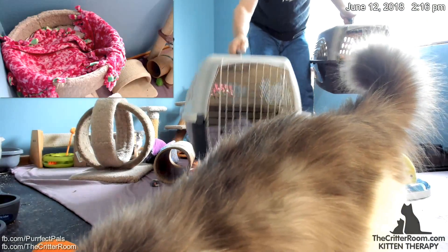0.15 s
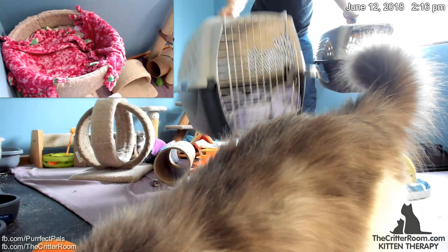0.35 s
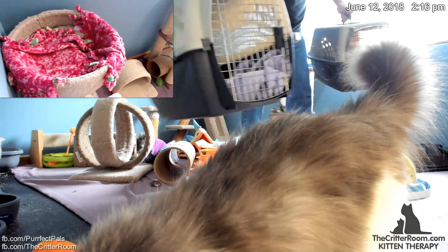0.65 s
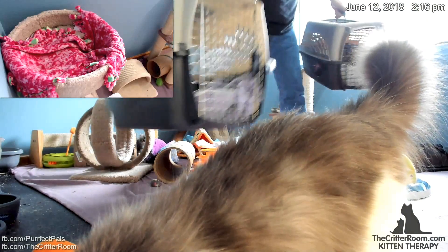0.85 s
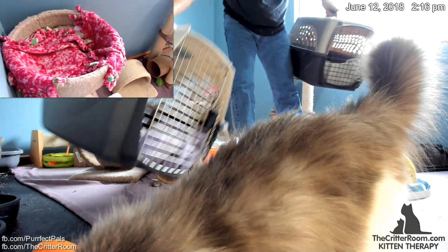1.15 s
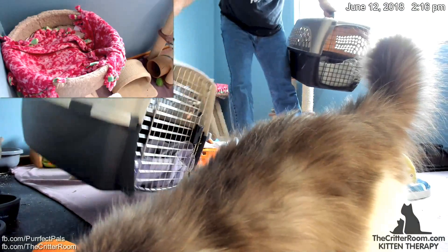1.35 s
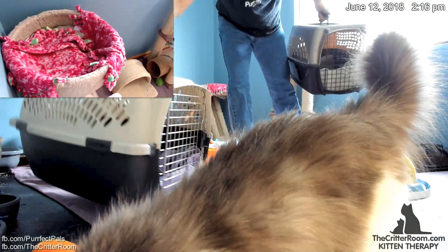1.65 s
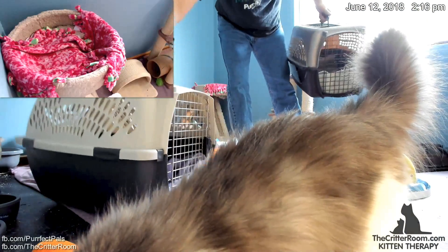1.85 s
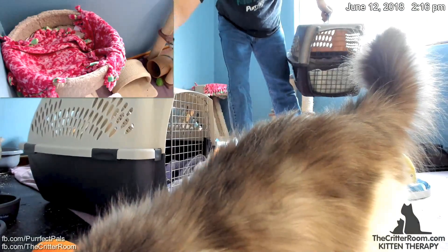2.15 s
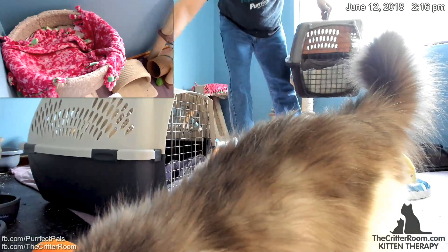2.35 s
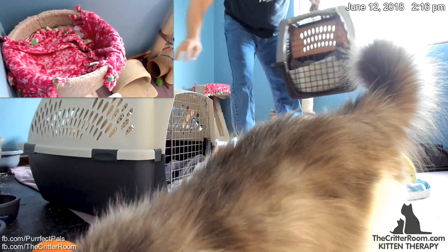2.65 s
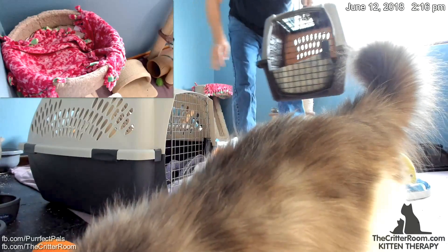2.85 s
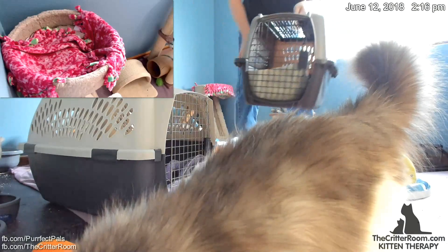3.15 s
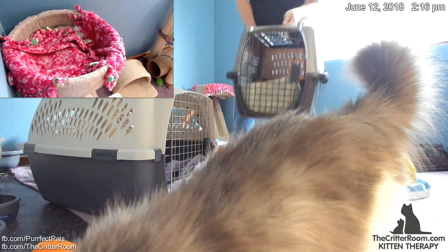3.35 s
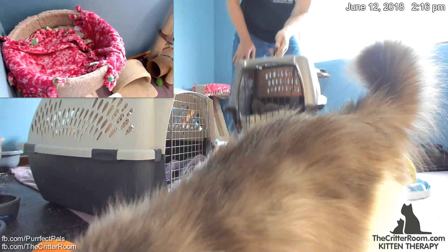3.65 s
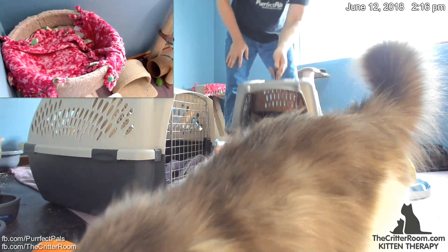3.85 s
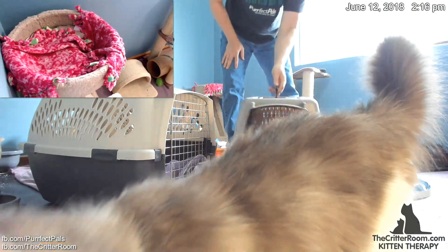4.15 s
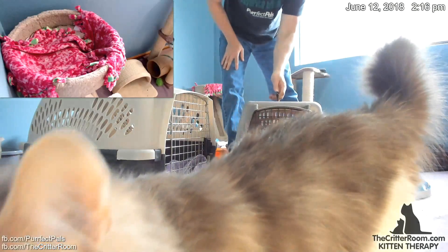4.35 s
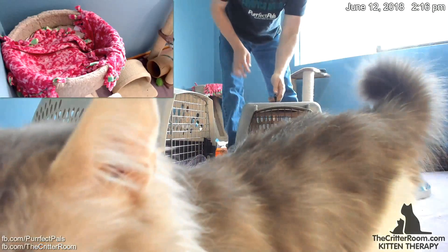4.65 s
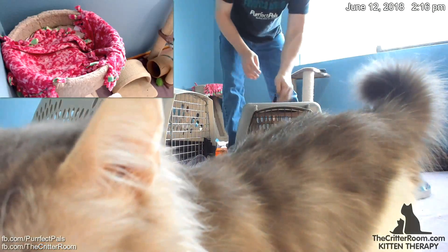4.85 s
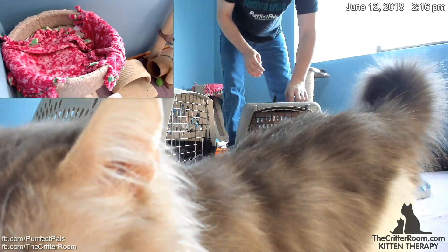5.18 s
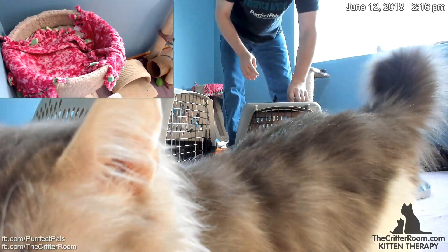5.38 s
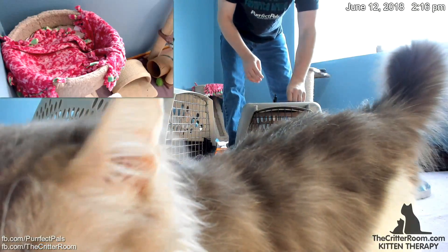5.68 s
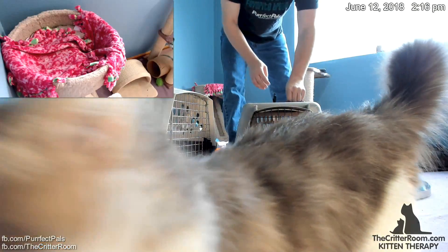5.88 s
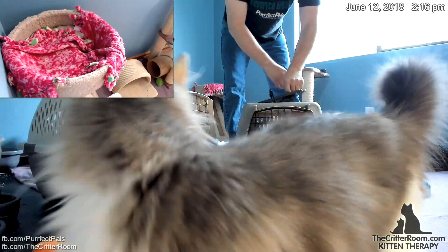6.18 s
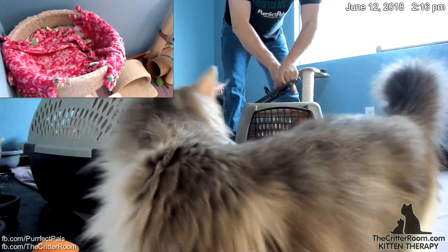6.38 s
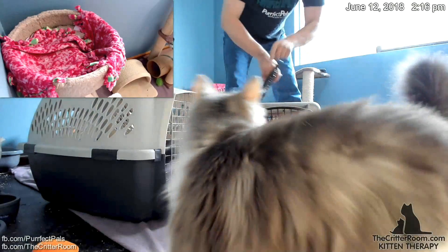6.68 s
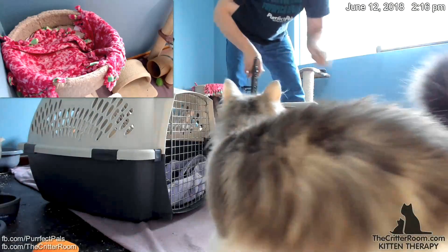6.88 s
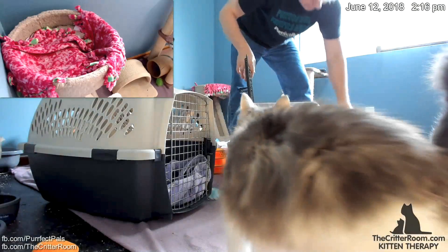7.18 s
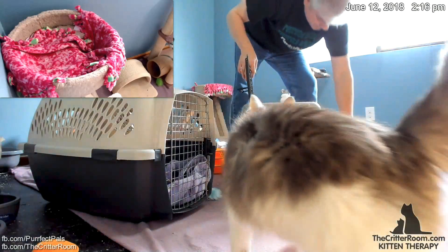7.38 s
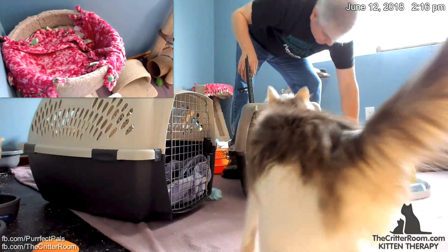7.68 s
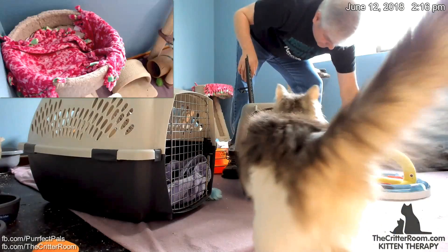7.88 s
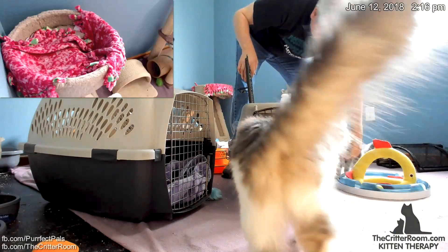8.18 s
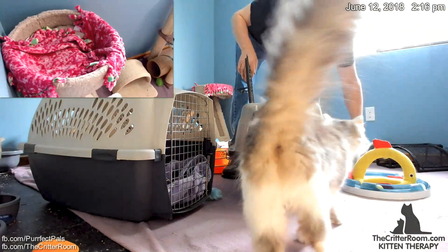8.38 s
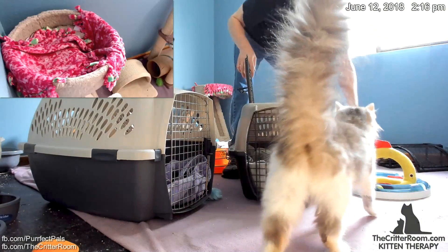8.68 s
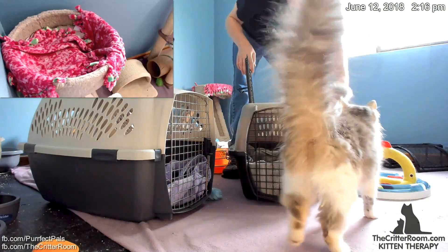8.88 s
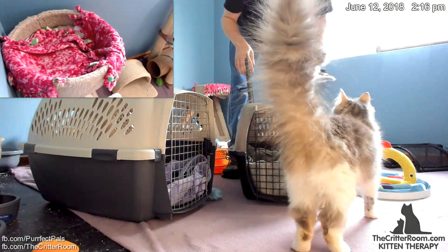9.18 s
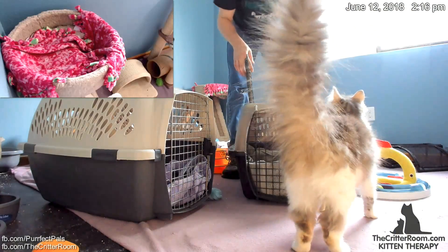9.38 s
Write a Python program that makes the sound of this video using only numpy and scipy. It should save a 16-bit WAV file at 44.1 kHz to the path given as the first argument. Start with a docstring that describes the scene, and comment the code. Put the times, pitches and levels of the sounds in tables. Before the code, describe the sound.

A quiet small room with soft air hiss and a faint low fan hum. From 0 to 1 s a load slides softly back and forth inside a plastic carrier; from 1.1 to 2.2 s come dull thumps, cloth swishes and tiny plastic squeaks. At about 2.37 s the big carrier hits the floor corner by corner with a loud hollow bang, the loudest event; the background ducks, then creeps back up. Around 3.3-3.45 s a smaller carrier lands with a lighter, ringing knock. From 4.2 to 5.3 s its handle taps and creaks. From 5.45 to 6.5 s the wire door clacks, scrapes and squeals metallically, ending in two sharp clacks. A close cat gives tiny hoarse chirps at 6.8 s and 7.86 s, a meow at 8.2-8.9 s turning from hoarse to clear and roughening at the end, and a raspy one from 9.2 s.

```python
"""Two plastic pet carriers are set down in a small room: a big one lands with a hollow bang, a smaller one with a knock.
Its handle drops and its wire top door is unlatched, scraped and swung open. Each blow mixes noise and fading tones;
rubbing is a stream of tiny clicks or noise. A cat close by chirps, gives a meow that starts hoarse and turns clear,
then starts a raspy second one, all built from harmonics. Quiet room air and a faint fan hum lie beneath.
The bang pushes the recorder's gain down, and it creeps back up."""
import sys
import numpy as np
from scipy import signal
from scipy.fft import rfft, irfft
from scipy.io import wavfile
from scipy.ndimage import uniform_filter1d

SR = 44100
rng = np.random.default_rng(int(sys.argv[2]) if len(sys.argv) > 2 else 0)


def store_pcm(level_fs):
    """Save levels as 16-bit WAV."""
    pcm = np.round(np.clip(level_fs, -1, 1) * 32767).astype(np.int16)
    wavfile.write(sys.argv[1], SR, np.atleast_2d(pcm).T)


N = 420273
TIME = np.arange(N) / SR

# All levels are those before the room and the recorder's gain. each carrier lands with a blow, then bounces and
# lands again [t/s, level/dB, bass/dB, treble/dB, build-up/s]
BIG_LANDING = [(2.3652, -13, 3, 4, .0006), (2.3755, -18, -10, -0.5, 0.0012), (2.3925, -23.5, -3, 3, 0.0012),
               (2.421, -36.5, -10.5, 0.5, 0.0021)]
SMALL_LANDING = [(3.3995, -22.5, 4.5, -10, 0.0014), (3.4115, -25.5, -13.5, 0.5, 0.0011),
                 (3.4245, -30, -2, -2, 0.0011)]
# light knocks on the big carrier [t/s, level/dB, bass/dB, treble/dB, build-up/s]
BIG_KNOCKS = [(0.002, -47.5, -4.5, 13, 0.0036), (0.52, -56.5, -13, -29, .0008),
              (0.987, -66, -29, 13, 0.00022), (1.124, -55.5, -13, 12, 0.0054),
              (1.642, -63.5, -2, -22, .002), (1.872, -53, 8.5, 9, .003), (2.213, -63, 2.5, -13.5, .006),
              (2.347, -35, -3, -5, .005), (2.728, -66, 3, -3, .003), (2.865, -64, -22, -18, .003)]
# light knocks on the small carrier, and its handle and lid knocking on the shell
# [t/s, level/dB, bass/dB, treble/dB]
SMALL_KNOCKS = [(3.280, -49, 4, -3), (3.336, -41.5, -16, 20), (3.353, -30.5, -1, -29),
                (3.492, -40.5, 1.5, -5)]
HANDLE_KNOCKS = [(4.236, -44.5, -20, 2.5), (4.244, -41.5, 13, -15), (4.283, -42.5, 1, -20),
                 (4.443, -50.5, 0, -18), (4.488, -49.5, 10, 1), (4.624, -44.5, -23, -1), (4.673, -38, 4, 7),
                 (4.941, -58.5, -12, 13), (5.085, -45.5, 18, 7.5), (5.339, -53.5, -45, 7.5),
                 (6.357, -42.5, 8.5, -10)]
# clacks of the latch and wire door [t/s, level/dB, treble/dB, build-up/s, shaken shell level/dB,
# struck wire level/dB, its lower ring f/Hz, its upper ring f/Hz]
CLACKS = [(5.461, -36, 13, 0.0087, -41, -38.5, 3800, 4900),
          (5.596, -46.5, 20, .002, -49, -46.5, 3540, 4690), (5.636, -57, -4, 0.0018, -49, -50, 3870, 4340),
          (5.695, -51, -9, .004, -46.5, -51, 2020, 4000), (5.752, -48, -7, 0.0069, -51.5, -47, 1940, 4350),
          (5.849, -56.5, -2, 0.0016, -82, -55, 3000, 4035), (5.987, -55, 3, 0.0036, -71, -52, 3900, 4940),
          (6.034, -40, 2.5, 0.0087, -58, -38, 4220, 4960), (6.096, -30, 3, 0.0054, -48.5, -49, 3830, 4270),
          (6.245, -45, 3, 0.0036, -69.5, -56, 4470, 6630), (6.276, -35, 11, 0.0022, -47, -40.5, 5980, 6800),
          (6.481, -27, 11.5, 0.0014, -49.5, -40, 3140, 4670),
          (6.5173, -29.5, 0, 0.000193, -30, -31, 5920, 7200)]
# soft thumps of footsteps and of the swinging load [t/s, level/dB, f/Hz]
THUMPS = [(1.135, -64, 254), (1.239, -61, 252), (1.368, -58, 220), (1.461, -55.5, 235), (1.556, -59, 253),
          (1.737, -45.5, 247), (1.786, -51, 263.6), (1.832, -52.5, 236), (1.884, -43.5, 253),
          (1.912, -45, 249.4), (1.958, -54, 227), (2.127, -60, 191), (2.237, -57.5, 241)]
# swishes of clothing; the wire door scraping in its frame; the load in the big carrier sliding
# back, then forth; the handle creaking [peak t/s, level/dB, rise/s, fall/s]
SWISHES = [(1.45, -66, 0.13, 0.13), (2.08, -66.5, 0.18, 0.055), (3.08, -60, 0.11, 0.3),
           (3.53, -57.5, 0.22, 0.11), (4.5, -56.5, 0.27, 0.11), (7.35, -69, 0.36, 0.52)]
SCRAPES = [(5.53, -46, 0.079, 0.078), (5.64, -41, 0.05, 0.09), (6.19, -57.5, 0.026, 0.086)]
SLIDES = [(.25, -58.5, 0.32, 0.19), (.64, -59, 0.14, 0.18)]
CREAKS = [(4.65, -47.5, 0.01, 0.066), (4.986, -50, 0.029, 0.052)]
# a resonance that rises as the load slides forth [t/s, level/dB, f/Hz]
SLIDE_RING = [(.56, -78, 2830), (.64, -75, 2980), (.78, -73, 3200), (.9, -84, 3500)]
# the plastic squeaks; single wires sing as the bolt and door rub along them
# [peak t/s, level/dB, f/Hz, rise/s, fall/s]
PLASTIC_SQUEAKS = [(1.484, -58, 2380, 0.0042, 0.017), (1.643, -52, 606, 0.0068, 0.021),
                   (1.885, -66, 670, 0.022, 0.04), (1.995, -65, 734, .01, .035),
                   (2.018, -66.5, 2200, .004, 0.033), (2.22, -60.5, 1098, .006, .03),
                   (3.29, -53, 2140, 0.0037, 0.05), (5.09, -67, 2840, 0.0044, 0.063),
                   (5.475, -37, 1170, .004, 0.033)]
WIRE_SQUEALS = [(5.461, -40, 3690, 0.0067, 0.012), (5.474, -46, 4960, .008, .016),
                (5.53, -43.5, 4720, 0.046, 0.083), (5.52, -51, 5250, .04, .05),
                (5.615, -51, 4890, .03, .03), (5.63, -48, 3521, 0.04, .03), (5.645, -44, 4300, .015, 0.032),
                (5.7, -45.5, 3950, 0.032, 0.042), (5.86, -53.5, 3960, 0.013, 0.056),
                (6.028, -49.5, 4990, 0.037, .012), (6.055, -42, 4270, .012, .025),
                (6.11, -44.5, 1818, 0.013, 0.045), (6.17, -48.5, 8930, .03, .03),
                (6.3, -52, 6700, .04, 0.043), (6.315, -46.5, 6060, .025, 0.042)]
# short chirps [t/s, length/s, starting level/dB, starting f/Hz, hoarseness/0-1, mouth opening/0-1]
CHIRPS = [(6.804, 0.079, -60, 486, 0.75, 0.33), (6.867, 0.062, -57, 502.5, 0.9, 0.32),
          (7.858, 0.035, -49.5, 408.5, 0.92, 0)]
# the course of each meow [t/s, level/dB, f/Hz, hoarseness/about 0-1, mouth opening/0-1]
LONG_MEOW = [(8.16, -66, 367, 0.6, 0), (8.2, -55.5, 424.6, 1.03, 0.13), (8.25, -52, 574.5, 0.74, 0.6),
             (8.34, -50.5, 591, 0.58, 0.65), (8.44, -61, 586.5, 0.75, 0.45), (8.485, -55.5, 576, 0.4, 0.7),
             (8.508, -50.5, 642, 0.07, 0.97), (8.58, -47, 662, 0.1, 0.73), (8.6, -57, 671, .15, 0.66),
             (8.64, -67, 664, 0.12, 0.5), (8.67, -56, 671, 0.18, 0.66), (8.715, -51.5, 673.3, 0.14, 0.62),
             (8.80, -66, 647.6, 0.18, 0.61), (8.838, -59.5, 672, 0.36, 0.57), (8.86, -57, 600, 0.99, 0.66),
             (8.895, -68, 566, 0.7, 0.4), (8.935, -73, 538, 0.6, 0.67)]
RASPY_MEOW = [(9.19, -66, 370, 0.87, 0), (9.23, -64.5, 412, 0.83, 0.15), (9.29, -54, 581.5, 0.79, .6),
              (9.37, -51.5, 591.4, 0.6, 0.53), (9.42, -55.5, 578, 0.73, 0.4), (9.46, -50, 482, 0.94, 0.19),
              (9.55, -57, 431, 0.88, 0.27)]
# the voice brightens as the mouth opens
# [opening/0-1, first resonance f/Hz, second resonance f/Hz, third resonance level/dB]
MOUTH = [(0, 400, 920, -35), (.33, 920, 1300, -48.5), (0.662, 1170, 1830, -5.5), (1, 1355, 2080, 8.5)]
# modes, the tones each object rings with [f/Hz, level/dB, time to fade by 60 dB/s]
BIG_MODES = [(207, 0, .18), (120, -16, .25), (172, -6, .2), (250, -1, .23), (318, -5, .16), (340, -1, .15),
             (469, 0, .17), (578, 2, .16), (603, -2, .13), (714, 0, .16), (785, -1, .17), (850, -7, .19),
             (1195, -10, .12), (1338, -10, .18), (1415, -11, .21), (1545, -14, .22), (1900, -17, .22)]
SMALL_MODES = [(433, -3, .3), (574, -1, .34), (590, -3, .48), (606, -1, .33), (894, -7, .18),
               (1163, -10, .26), (1225, -9, .38), (1319, -2, .2), (1443, -11, .28), (1717, -11, .23),
               (1870, -14, .3), (2336, -12, .18)]
HANDLE_MODES = [(272, -22, .3), (317.4, 7.5, 0.19), (414, 7.5, 0.08), (483.5, 6.5, 0.23), (825, -6.5, 0.32),
                (1228, -5.5, 0.46), (1400, -16, 0.21), (1850, -9.5, 0.22), (2185, 4, 0.087),
                (2470, -4, 0.24), (2590, 1, 0.072), (3800, -14.5, 0.172), (4770, -7, 0.129)]
WIRE_MODES = [(2420, -9, 0.17), (3390, 2, 0.16), (3800, -9, 0.098), (4130, 7, 0.17), (4370, -4.5, 0.13),
              (4770, 5, 0.16), (5150, 4, 0.16), (5230, -21.5, 0.14), (5800, -19, .093), (6050, -6, 0.26),
              (6660, -1, 0.34), (7700, -1.5, 0.25), (8330, 1, 0.22)]
SHELL_MODES = [(336, -6.5, 0.27), (407, 9.5, 0.072), (462, 3.5, 0.094), (718, -20, 0.18), (1766, -8, .23),
               (1830, -6, .2), (2243, -16.5, 0.22), (2240, -5, 0.12)]  # the shell around the latch
CREAK_MODES = [(312, -8, 0.14), (870, 3, 0.045), (1038, -6, 0.018), (1335, -0.5, 0.0075),
               (1890, -8.5, 0.011), (2940, -4.5, 0.021), (4700, -2.5, 0.0065)]
# modes of a thump [multiple of its f, level/dB, time to fade by 60 dB/s]
THUMP_MODES = [(.5, -14.5, .08), (.8, -9, .07), (1, 0, 0.14), (1.17, -15, 0.14), (2.399, -20.5, 0.074),
               (2.75, -22.5, 0.093), (3.2, -23.5, 0.09)]
# colour of the dense higher modes, of rubbing and of the room's hiss [f/Hz, level per Hz/dB]
BIG_COLOUR = [(24, -65.5), (40, -34.5), (91, -14), (135, -19.5), (244, 3.5), (466, -5), (520, -9),
              (740, -5.5), (1040, -15), (1400, -13.5), (1920, -16.5), (4200, -25), (6620, -35),
              (11400, -46.5), (12900, -87), (15000, -99)]
SMALL_COLOUR = [(47, -95), (80, -29), (184, -34), (304, -13), (355, -15), (423, -4.5), (515, -8), (587, -5),
                (747, -11), (1290, -8), (2400, -16), (4030, -26), (10600, -38.5), (15000, -77)]
HANDLE_COLOUR = [(47, -51.5), (80, -30), (161, -6), (239, -5.5), (298, 3.5), (641, -7.5), (852, 1.5),
                 (930, -12), (1180, -5), (4910, -18), (7780, -25), (15000, -58.5)]
WIRE_COLOUR = [(88, -67.5), (150, -9.5), (388, -3), (643, -18), (827, -15.5), (1480, -12), (1800, -9),
               (2180, -8), (2600, -4), (3350, -7.5), (4750, -4.5), (9730, -12), (14100, -29.5),
               (15500, -70)]
SHELL_COLOUR = [(47, -48), (100, -24), (190, -6.5), (260, -8.5), (390, -4), (560, -7.5), (720, -6.5),
                (950, -8), (1400, -10), (2200, -10.5), (3300, -25), (7800, -25), (15000, -75)]
CLOTH_COLOUR = [(200, -1), (700, 2.5), (2000, 0.5), (3500, -3.5), (6000, -1), (9000, -7), (14000, -22)]
HISS_COLOUR = [(15, -43), (25, -12), (140, -4.5), (169, -2.5), (359, -4), (389, -7), (421, -5), (970, -8),
               (1170, -10), (1900, -12.5), (3090, -15.5), (5430, -20), (6050, -21.5), (15500, -30)]
# one such list for the slide back, one for the slide forth [f/Hz, level per Hz/dB]
SLIDE_COLOURS = [
    [(180, -54), (300, -26), (506, -23), (900, 2.5), (1190, -15.5), (1500, -2.5), (1770, -15), (2140, -5),
     (3190, -24), (4310, -27), (5370, -18), (8000, -30), (10400, -65)],
    [(180, -65), (300, -26), (441, -28), (564, -20), (723, 6), (938, -15), (1500, 4.5), (1810, -9),
     (2080, 10.5), (2670, -17), (3060, -17), (5230, -35), (8000, -38), (10400, -64)],
]


def undb(db):
    """Turn decibels into a gain."""
    return 10 ** (np.asarray(db) / 20)


def unit(x):
    """Scale a sound to an average (rms) strength of one."""
    return x / np.sqrt(np.mean(x ** 2) + 1e-18)


def swell(s, db, rise_s, fall_s, t=TIME):
    """Gain of one stroke of movement: it grows to a peak and dies away."""
    distance = np.maximum((s - t) / rise_s, (t - s) / fall_s)
    return undb(db) * np.exp(-np.minimum(distance ** 2, 20))


def swells(table):
    """Gain of all strokes in a table together."""
    return sum(swell(*row) for row in table)


def add(track, s, sound):
    """Mix a sound into a track at a time in seconds."""
    start = max(int(s * SR), 0)
    track[start:start + len(sound)] += sound[:N - start]


def add_blow(track, s, db, sound):
    """Mix in a blow whose level is that of its first 30 ms."""
    add(track, s, undb(db) * sound / np.std(sound[:int(.03 * SR)]))


def colour(x, points):
    """Filter to a (Hz, dB) spectrum without sounding early, by way of the cepstrum."""
    size = 4096
    hz, db = np.transpose(points)
    grid = np.maximum(np.fft.rfftfreq(size, 1 / SR), 1)
    cepstrum = irfft(np.log(undb(np.interp(np.log(grid), np.log(hz), db))))
    # folding the second half onto the first puts the response after the input
    cepstrum[1:size // 2] *= 2
    cepstrum[size // 2 + 1:] = 0
    return signal.fftconvolve(x, irfft(np.exp(rfft(cepstrum))))[:len(x)]


def fade(t, t60):
    """Exponential decay by 60 dB in t60 seconds."""
    return np.exp(-np.log(1000) * t / t60)


def wander(rate, t=TIME):
    """Smooth chance with a strength of one, changing about rate times a second."""
    steps = rng.standard_normal(int(N / SR * rate) + 2)
    return unit(np.interp(t * rate, np.arange(len(steps)), steps))


def resonate(x, hz, t60):
    """One mode driven by a force."""
    pole = np.exp(2j * np.pi * hz / SR) * fade(1 / SR, t60)
    return signal.lfilter([1], [1, -pole], x).imag


def peak(hz, centre_hz, width_hz):
    """Gain of a steep-sided resonance."""
    return (1 + ((hz - centre_hz) / width_hz) ** 2) ** -2


def ring(modes, t, detune=.002, scatter_db=4.5):
    """Decaying modes; each contact point excites them a little differently."""
    chance = rng.standard_normal((len(modes), 3))
    total = 0
    for (hz, db, t60), (louder, sharper, side) in zip(modes, chance):
        gain = undb(db + scatter_db * louder) * np.sign(side)
        total = total + gain * fade(t, t60) * np.sin(2 * np.pi * hz * (1 + detune * sharper) * t)
    return total


def slips(rate, spread_db, uneven_db):
    """Friction: a stream of tiny slips of unequal size, coming in spurts."""
    clicks = (rng.random(N) < rate / SR) * rng.choice([-1, 1], N)
    return unit(clicks * undb(spread_db * rng.standard_normal(N) + uneven_db * wander(40)))


def room(x, wet_db, t60=0.32, gap_s=0.003):
    """Direct sound and the short, dull tail of a small furnished room."""
    t = TIME[:SR // 2]
    noise = rng.standard_normal(len(t)) * fade(t, t60) * (t > gap_s)
    tail = colour(noise, [(200, -0.5), (4000, -4), (12000, -4.0)])
    wet = signal.fftconvolve(x, tail / np.sqrt(np.sum(tail ** 2)))[:N]
    return (x + undb(wet_db) * wet) / np.sqrt(1 + undb(2 * wet_db))


def hiss(air_db=-67.5, hum_hz=172, hum_db=-11):
    """Quiet, steady room air as coloured noise, with a faint fan hum that wavers in level."""
    air = unit(colour(rng.standard_normal(N), HISS_COLOUR))
    hum = np.sin(2 * np.pi * hum_hz * TIME) * undb(hum_db + 2 * wander(5.5))
    return (air + hum) * undb(air_db)  # the hum is set relative to the air


def clothing():
    """Countless fibres blur into a smooth swish."""
    cloth = unit(colour(rng.standard_normal(N), CLOTH_COLOUR)) * undb(wander(24))
    return cloth * swells(SWISHES)


def thumps(push_s=.008):
    """Soft, slow pushes that wake only the low modes, each at its own pitch."""
    track, t = np.zeros(N), np.arange(int(.4 * SR)) / SR
    for s, db, pitch in THUMPS:
        modes = [(pitch * multiple, *rest) for multiple, *rest in THUMP_MODES]
        add_blow(track, s, db, ring(modes, t) * (1 - np.exp(-t / push_s)))
    return track


def call(curve, bright_db, leak_db, jitter=0.096, shimmer_db=5.0, second_db=-2, reflection_db=3):
    """Vocal folds that flutter when hoarse, heard through a mouth that opens and closes."""
    s, *columns = np.transpose(curve)
    sounding = (TIME > s[0]) & (TIME < s[-1])
    t = TIME[sounding]
    db, pitch, hoarse, opening = (np.interp(t, s, c) for c in columns)
    openings, *mouth = np.transpose(MOUTH)
    first, second, third_db = (np.interp(opening, openings, c) for c in mouth)
    pitch = pitch * (1 + jitter * hoarse * wander(300, t) + 0.0064 * wander(70, t))
    phase = 2 * np.pi * np.cumsum(pitch) / SR
    clear = np.clip(1 - 2 * hoarse, 0, 1)
    voice, power = 0, 0
    for k in np.arange(1, 14):  # harmonics
        hz = k * pitch
        upper = undb(second_db) * peak(hz, second, 224) + undb(third_db) * peak(hz, 2360, 480)
        # high throat resonances: a rasp when hoarse, a thin whistle when clear
        upper += undb(third_db - 11.5) * hoarse * peak(hz, 4850, 506)
        upper += undb(-14.5) * clear * peak(hz, 7230, 820)
        leak = undb(leak_db) / k ** 3  # the fundamental leaks through the cheeks
        gain = peak(hz, first, 294) + undb(bright_db) * upper + leak
        # reflections shift the harmonics as the cat walks
        gain = gain * undb(reflection_db * wander(16, t))
        voice = voice + gain * np.sin(k * phase)
        power = power + gain ** 2 / 2
    attack, release = (t - s[0]) / 0.0073, (s[-1] - t) / 0.032  # both times in s
    envelope = np.clip(np.minimum(attack, release), 0, 1)
    level = undb(db + shimmer_db * hoarse * wander(220, t))
    track = np.zeros(N)
    track[sounding] = voice / np.sqrt(power) * envelope * level
    return track


def cat(sag_hz_per_s=404, chirp_fade_db=-0.5):
    """Short chirps whose voice sags in pitch and level, then the two meows."""
    track = np.zeros(N)
    for s, length, db, hz, hoarse, opening in CHIRPS:
        start = (s, db, hz, hoarse, opening)
        end = (s + length, db + chirp_fade_db, hz - sag_hz_per_s * length, hoarse, opening)
        track += call([start, end], bright_db=-6, leak_db=-14.5)
    meow = call(LONG_MEOW, bright_db=1, leak_db=-19, jitter=.09)
    rasp = call(RASPY_MEOW, bright_db=-7, leak_db=-18, jitter=.1)
    return track + meow + rasp


def squeaks(table, t60):
    """Each stick-slip contact drives one resonance for as long as it lasts."""
    track, force = np.zeros(N), slips(rate=2000, spread_db=3.5, uneven_db=1.5)
    for s, db, hz, rise_s, fall_s in table:
        near = slice(int((s - 3 * rise_s) * SR), int((s + 3 * fall_s) * SR))
        track[near] += unit(resonate(force[near], hz, t60)) * swell(s, db, rise_s, fall_s, TIME[near])
    return track


def creaks():
    """The handle sticks and slips in its hinge and sounds the hollow lid."""
    force = slips(rate=830, spread_db=1.5, uneven_db=-1)
    lid = unit(sum(undb(db) * unit(resonate(force, hz, t60)) for hz, db, t60 in CREAK_MODES))
    return lid * swells(CREAKS)


def door_scrapes(wire_db=-4, shift_db=4, damping=0.3):
    """The wire door scrapes: the contact damps the wires and wakes now one, now another."""
    chatter = slips(rate=2000, spread_db=3.5, uneven_db=1.5)
    wires = 0
    for hz, db, t60 in WIRE_MODES:
        gain = undb(db + shift_db * wander(22))  # the contact travels along the wires
        wires = wires + gain * resonate(chatter, hz, damping * t60)
    scrape = unit(unit(colour(chatter, WIRE_COLOUR)) + undb(wire_db) * unit(wires))
    return scrape * swells(SCRAPES)


def sliding_ring(width_hz=800):
    """The sliding load rasps in a band of noise that moves with the contact."""
    s, db, hz = np.transpose(SLIDE_RING)
    phase = 2 * np.pi * np.cumsum(np.interp(TIME, s, hz)) / SR
    rasp = unit(wander(width_hz) * np.sin(phase) + wander(width_hz) * np.cos(phase))
    return rasp * np.interp(TIME, s, undb(db), left=0, right=0)


def sliding_load():
    """The load slides on plastic: tiny slips coloured by each stroke, plus the rising rasp."""
    track = sliding_ring()
    for spectrum, stroke in zip(SLIDE_COLOURS, SLIDES):
        friction = slips(rate=3500, spread_db=1.5, uneven_db=4.5)
        track += unit(colour(friction, spectrum)) * swell(*stroke)
    return track


def struck_wires(ring_s=0.19, rise_s=0.0015, split=.028, lower_db=0.5):
    """Each clack catches another wire, which rings in two clusters of close, beating modes."""
    track, t = np.zeros(N), np.arange(int(.5 * SR)) / SR
    for s, *_, db, lower_hz, upper_hz in CLACKS:
        modes = [(hz * (1 + k * split), share_db - 3 * abs(k), ring_s)
                 for hz, share_db in [(lower_hz, lower_db), (upper_hz, 0)] for k in range(-2, 3)]
        add_blow(track, s, db, ring(modes, t, detune=.005, scatter_db=3) * (1 - np.exp(-t / rise_s)))
    return track


def blows(table, modes, spectrum, t60, modes_db, crack_db, crack_s, scatter_db, cutoff_hz):
    """Each blow: a short crack, a dense clatter of panel modes and the object's main modes."""
    track, t = np.zeros(N), np.arange(int(.45 * SR)) / SR
    head = t < .03
    # thin panels radiate little deep bass
    radiation = signal.butter(2, cutoff_hz, "high", fs=SR, output="sos")
    for s, db, bass_db, treble_db, rise_s in table:
        build = 1 - np.exp(-t / rise_s)
        # only a sudden contact cracks
        crack = undb(crack_db) * np.exp(-rise_s / 0.0031) * np.exp(-t / crack_s)
        clatter = colour((fade(t, t60) * build + crack) * rng.standard_normal(len(t)), spectrum)
        tones = ring(modes, t, detune=.002 * scatter_db, scatter_db=scatter_db) * build
        sound = clatter / np.std(clatter[head]) + undb(modes_db) * tones / np.std(tones[head])
        # a flat, heavy contact favours the bass, a hard corner the treble
        sound = colour(sound, [(280, bass_db), (700, 0), (2000, 0), (5000, treble_db)])
        add_blow(track, s, db, signal.sosfilt(radiation, sound))
    return track


def knocks(table, rise_s):
    """Light blows that share one build-up time."""
    return [(*row, rise_s) for row in table]


def wire_door(drag_s=0.013, drag_db=-10.5, drag_rise_s=0.015, bass_db=-15):
    """The bolt drags just before each clack home, and the wires of the door ring."""
    table = []
    for s, db, treble_db, rise_s, *_ in CLACKS:
        table += [(s - drag_s, db + drag_db, bass_db, treble_db, drag_rise_s)]
        table += [(s, db, bass_db, treble_db, rise_s)]
    return blows(table, WIRE_MODES, WIRE_COLOUR, t60=0.28,
                 modes_db=-6, crack_db=8, crack_s=.002, scatter_db=5, cutoff_hz=260)


def shaken_shell(bass_db=-4.5, treble_db=10.5, rise_s=0.0063):
    """Each clack shakes the plastic around the latch."""
    table = [(s, shell_db, bass_db, treble_db, rise_s) for s, _, _, _, shell_db, *_ in CLACKS]
    return blows(table, SHELL_MODES, SHELL_COLOUR, t60=0.24,
                 modes_db=0.0, crack_db=15.0, crack_s=0.00092, scatter_db=3, cutoff_hz=100)


def handle():
    """The handle and lid knock on the hollow shell."""
    return blows(knocks(HANDLE_KNOCKS, rise_s=0.0046), HANDLE_MODES, HANDLE_COLOUR, t60=0.24,
                 modes_db=-4.5, crack_db=14.0, crack_s=0.00069, scatter_db=1.5, cutoff_hz=45)


def small_carrier():
    """The small plastic box lands on the floor, bounces, and rings."""
    return blows(SMALL_LANDING + knocks(SMALL_KNOCKS, rise_s=0.0053), SMALL_MODES, SMALL_COLOUR, t60=0.33,
                 modes_db=-4.5, crack_db=12, crack_s=0.0042, scatter_db=1.0, cutoff_hz=58)


def big_carrier():
    """The big plastic box bangs on the floor, and its lower modes sound hollow."""
    return blows(BIG_LANDING + BIG_KNOCKS, BIG_MODES, BIG_COLOUR, t60=0.22,
                 modes_db=-5.5, crack_db=9.5, crack_s=.004, scatter_db=-0.5, cutoff_hz=85)


def scene():
    """Both carriers, the door and the cat in one room."""
    friction = clothing() + sliding_load() + door_scrapes() + creaks()
    friction += squeaks(PLASTIC_SQUEAKS, t60=0.017) + squeaks(WIRE_SQUEALS, t60=0.084)
    hits = thumps() + struck_wires() + wire_door() + shaken_shell() + handle() + small_carrier()
    mix = hiss() + room(cat(), wet_db=-0.5) + room(friction, wet_db=-8)
    mix += room(hits, wet_db=-12.5) + room(big_carrier(), wet_db=-14, t60=0.35)
    return mix[None]


def gain_control(x, ceiling_db=-19, recover_db_per_s=1.1753):
    """The gain creeps up steadily and drops at once when the sound would pass the ceiling."""
    power = np.abs(uniform_filter1d(x ** 2, size=int(.06 * SR)))
    level_db = 10 * np.log10(power + 1e-12)
    creep_db = recover_db_per_s * TIME
    excess_db = np.minimum(ceiling_db - level_db - creep_db, 0)
    # each drop stays; only the creep brings the gain back
    return x * undb(creep_db + np.minimum.accumulate(excess_db, axis=-1))


def record(dry):
    """The recorder rides its gain and cuts the top above 15.6 kHz."""
    top_cut = signal.ellip(8, .2, 70, 15600, fs=SR, output="sos")
    return signal.sosfilt(top_cut, gain_control(dry))


dry = scene()
out = record(dry)
store_pcm(out)
```